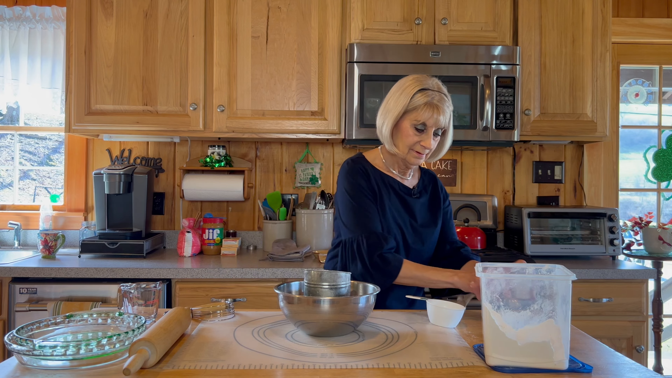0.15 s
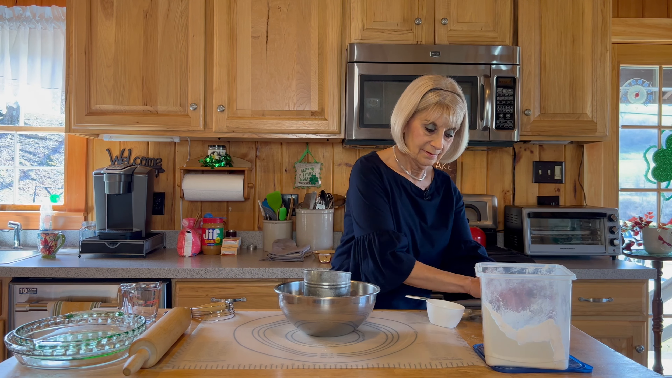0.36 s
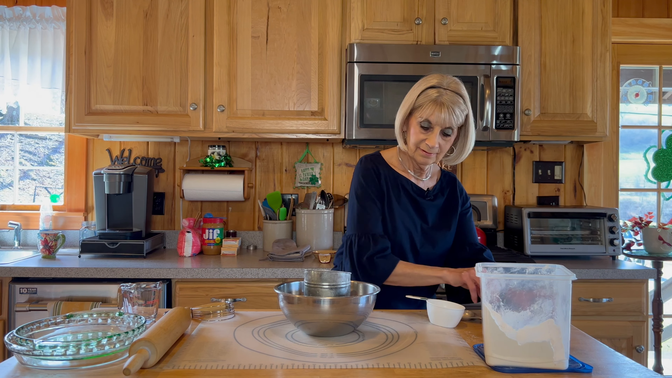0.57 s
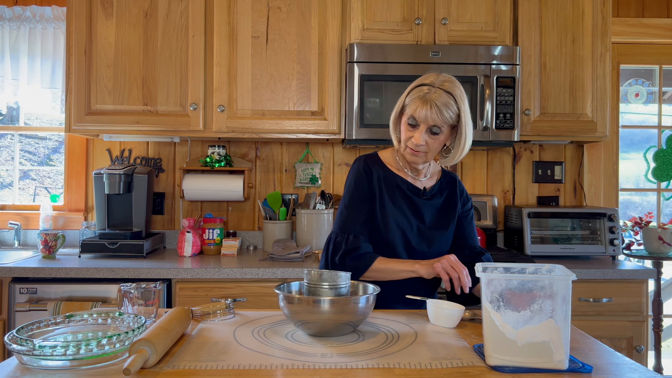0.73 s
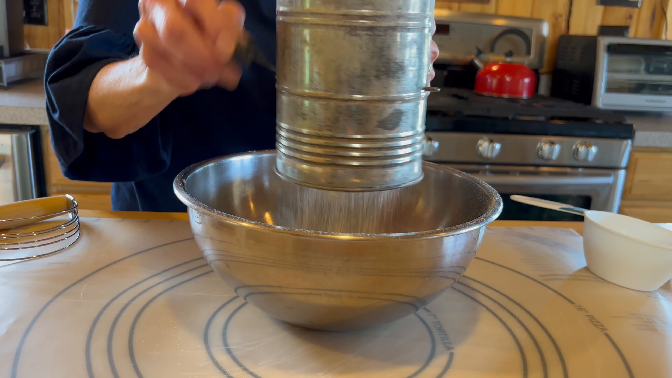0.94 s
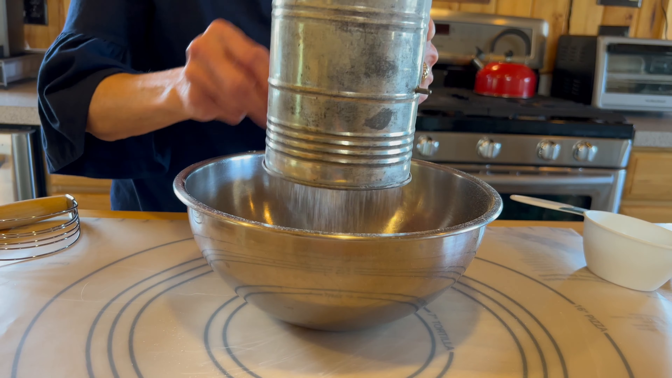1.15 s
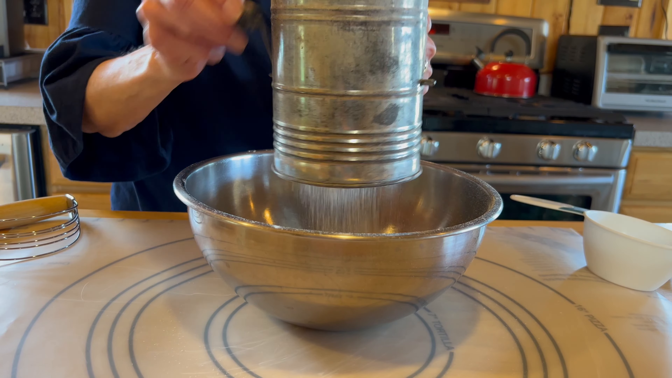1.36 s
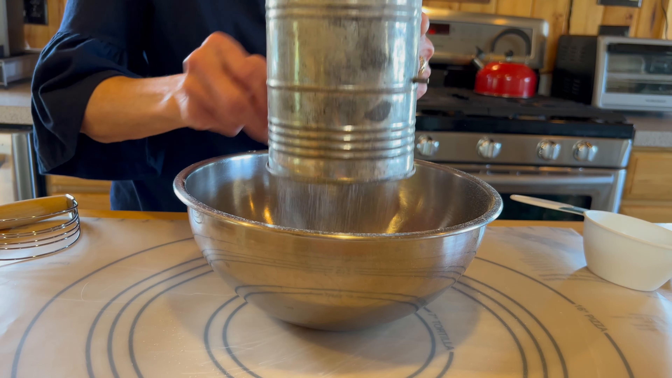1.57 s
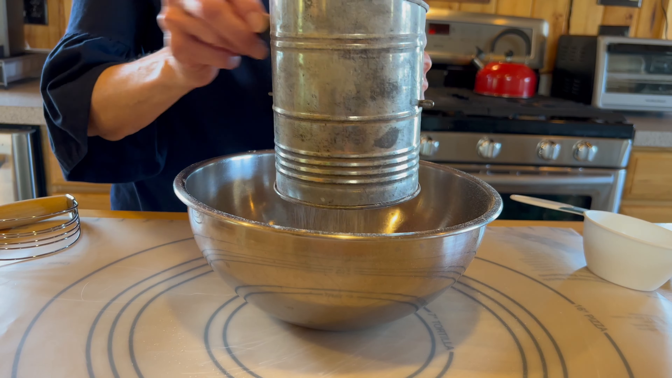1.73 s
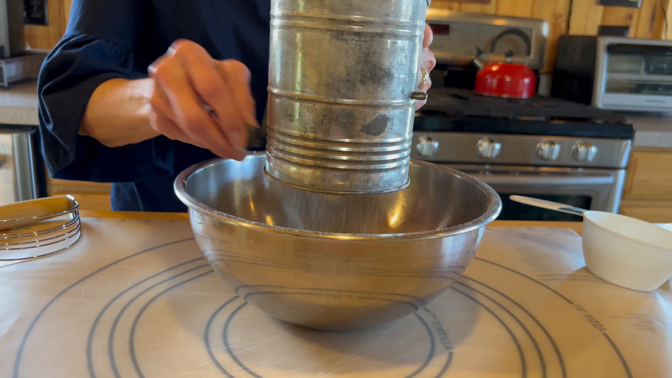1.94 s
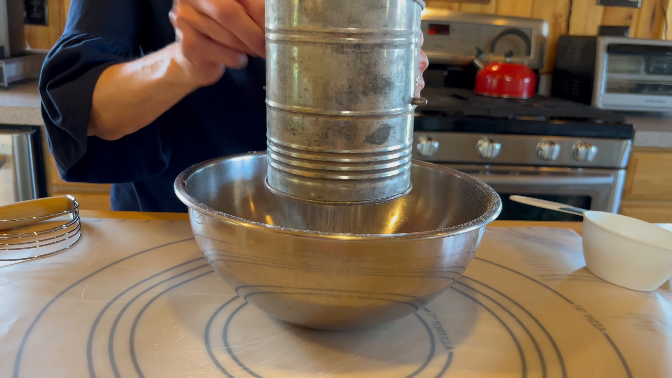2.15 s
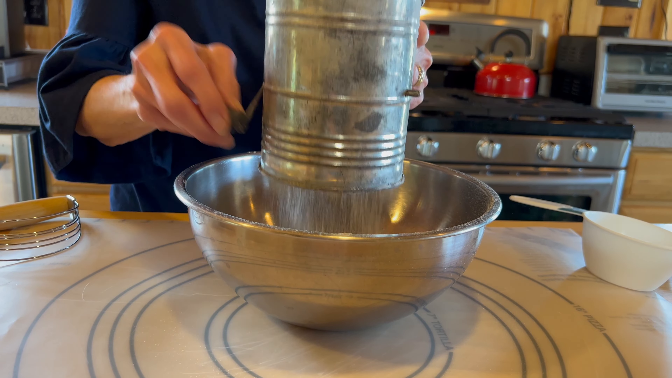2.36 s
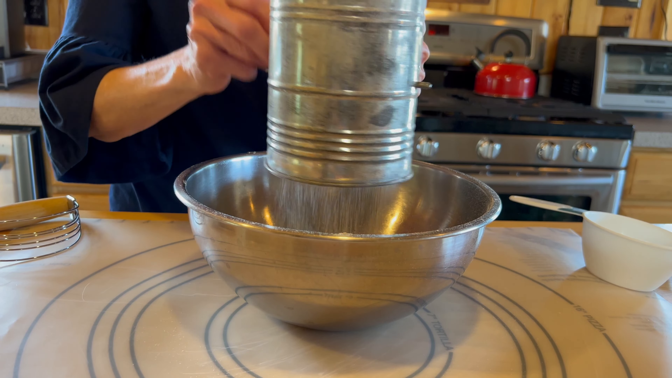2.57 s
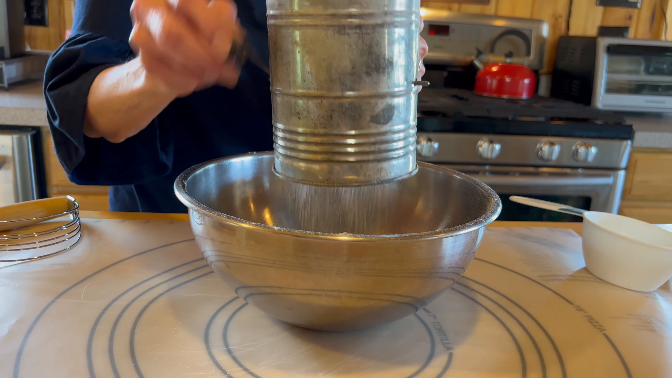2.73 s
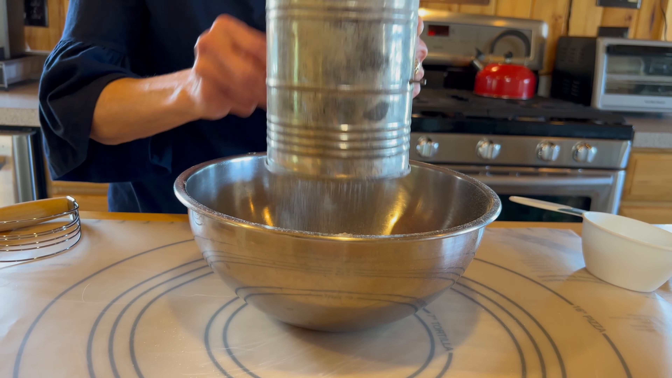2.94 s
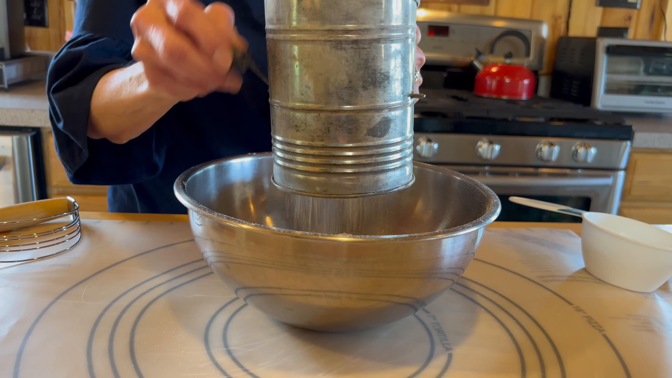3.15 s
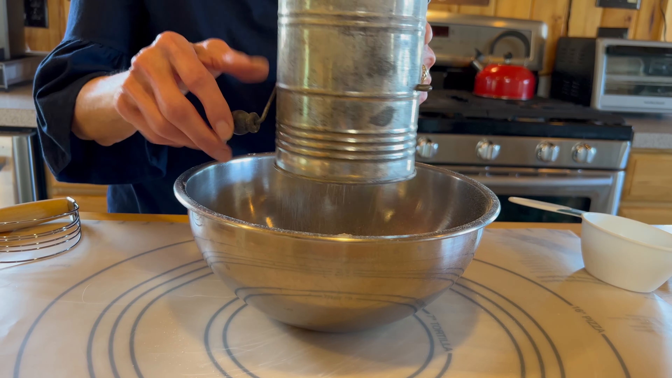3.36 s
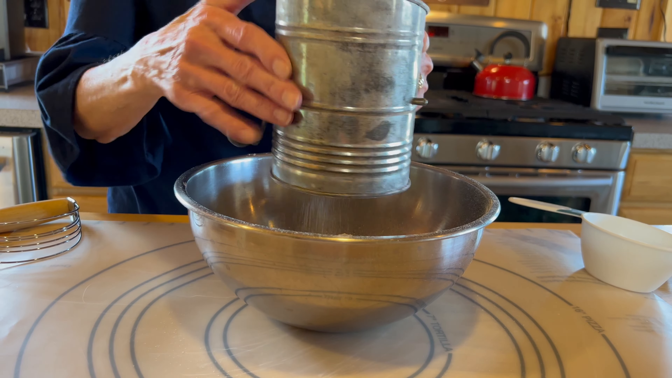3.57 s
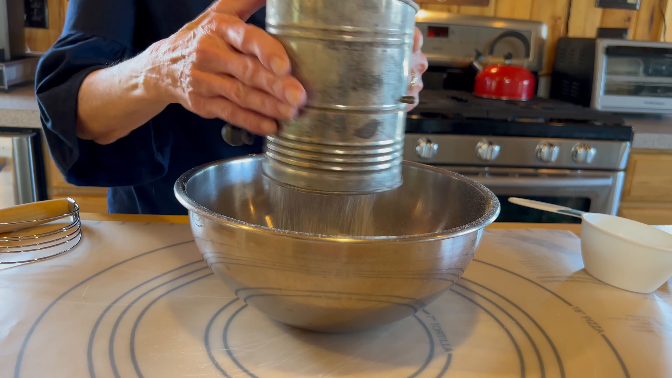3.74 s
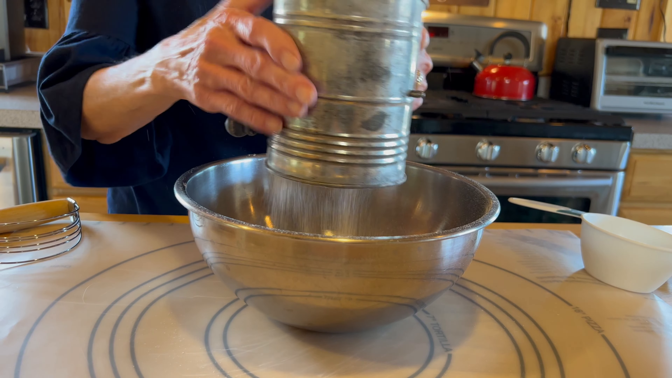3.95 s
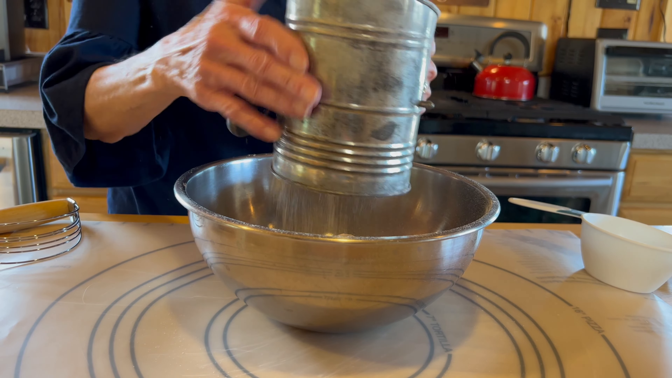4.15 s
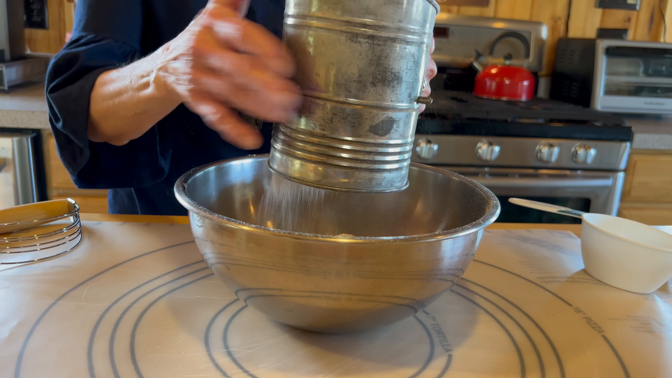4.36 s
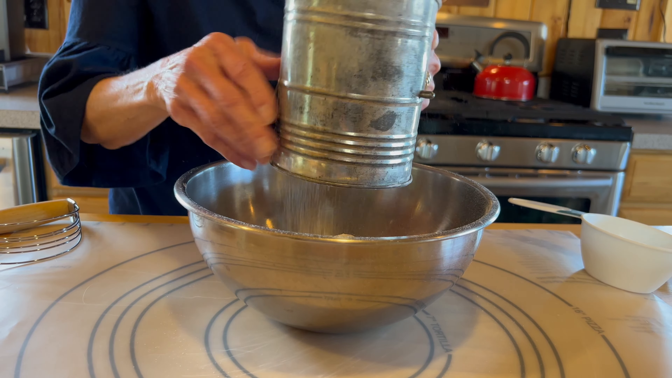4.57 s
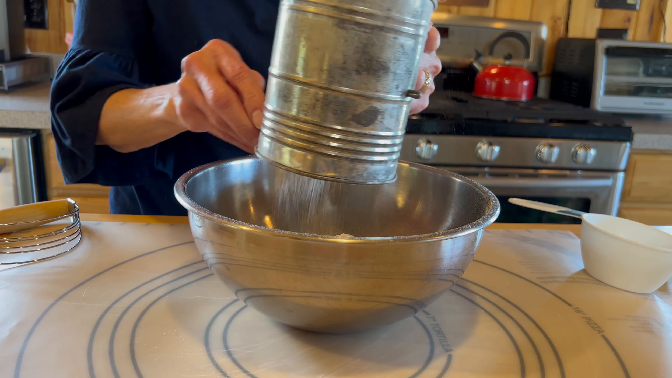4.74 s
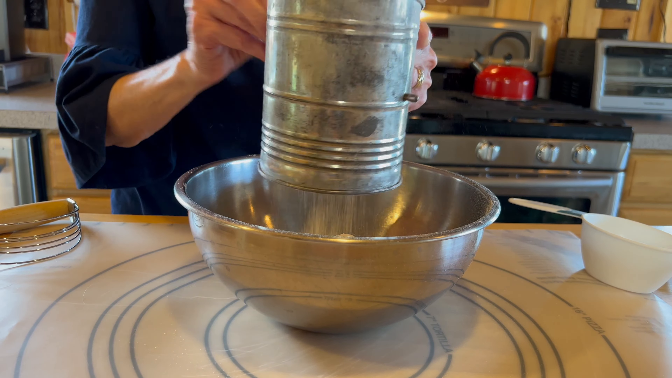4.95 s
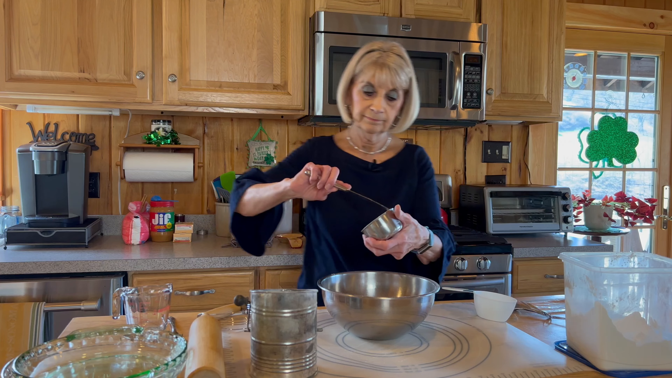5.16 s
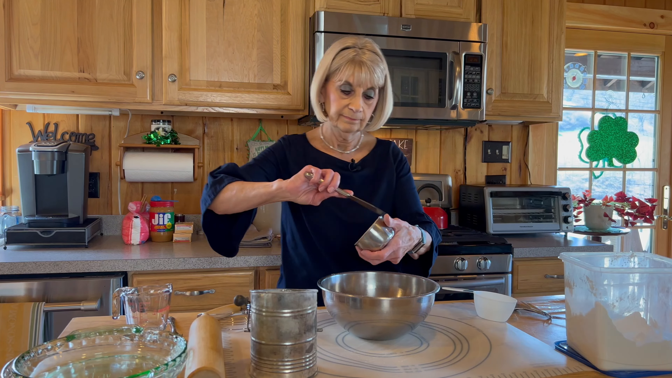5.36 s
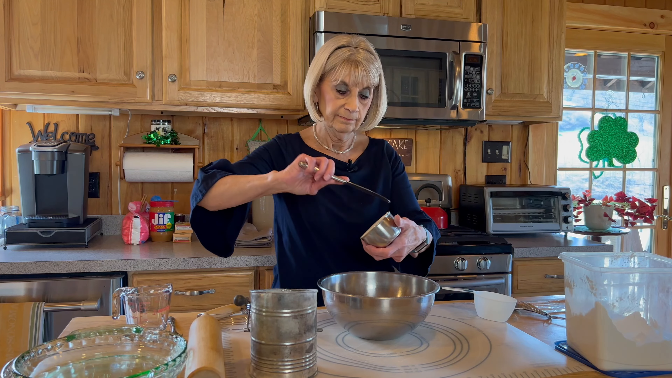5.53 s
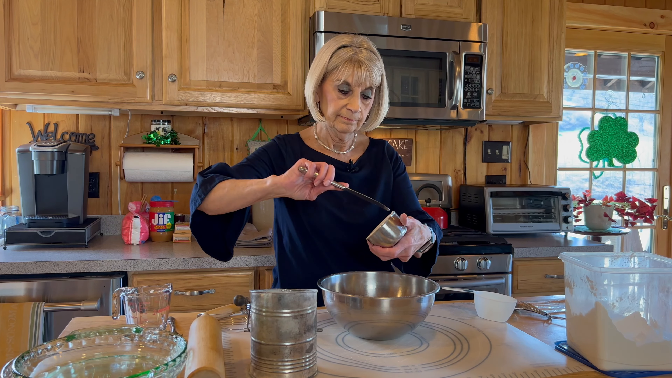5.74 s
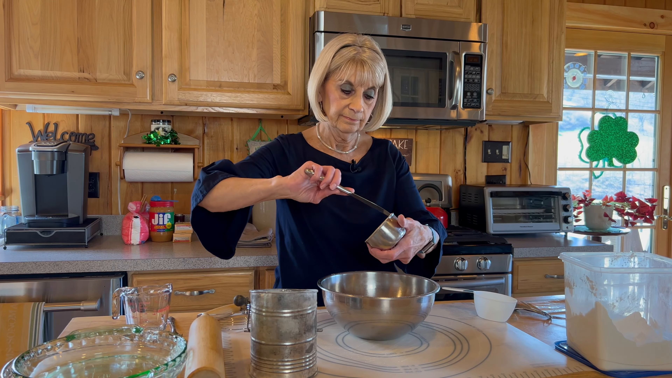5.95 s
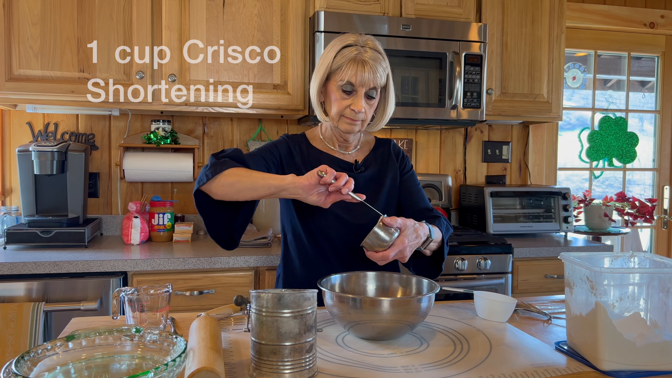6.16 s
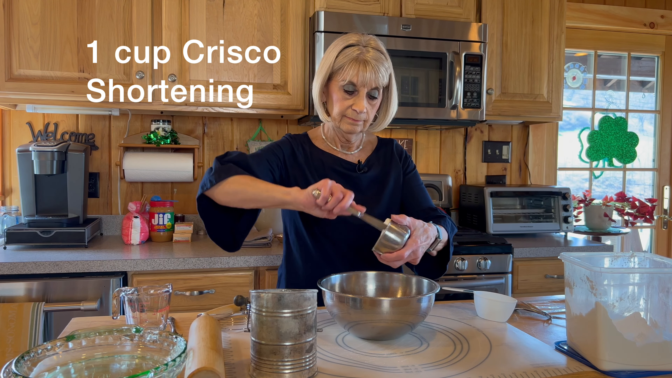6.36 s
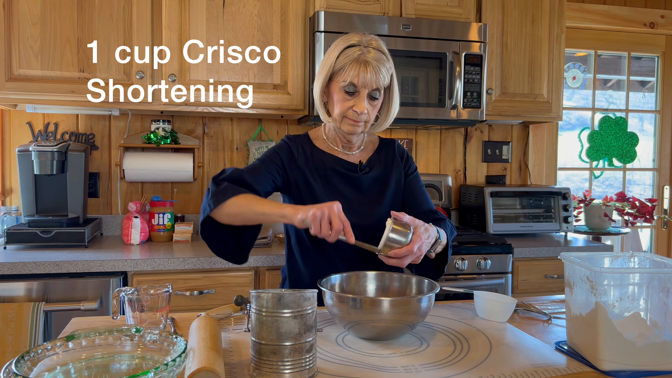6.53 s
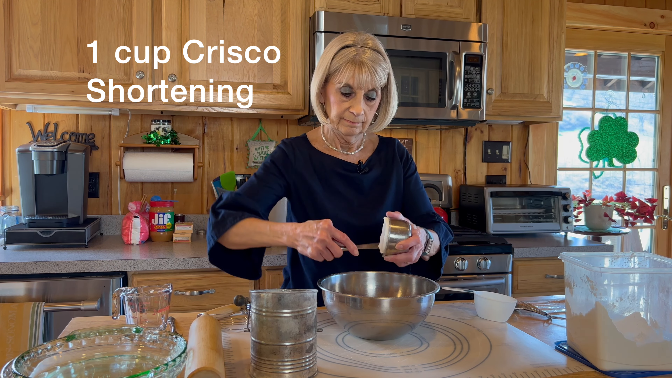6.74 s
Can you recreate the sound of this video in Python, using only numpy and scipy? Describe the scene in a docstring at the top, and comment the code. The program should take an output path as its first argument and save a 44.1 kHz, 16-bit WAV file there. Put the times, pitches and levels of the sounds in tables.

```python
"""A kitchen, close to one microphone, in three joined scenes over room tone and a faint appliance whine.
First metal scoops jangle in a wooden drawer that thuds shut. From 0.93 s a tin flour sifter is cranked,
its two wire beaters rasping over the mesh and snapping free; from 3.56 s a palm pats the can six times,
and a few slow drags and loose clicks follow. After 5 s a spoon taps a cup twice, then scrapes along its
wall, squelching through fat, and the hollow note of the cup rises as it empties."""
import sys
import numpy as np
from scipy import signal
from scipy.io import wavfile
from scipy.ndimage import uniform_filter1d

SR = 44100
rng = np.random.default_rng(int(sys.argv[2]) if len(sys.argv) > 2 else 0)


def persist_wave(psi):
    """Save psi, clipped to +-1, as 16-bit WAV."""
    counts = np.round(np.clip(psi, -1, 1) * 32767).astype(np.int16)
    wavfile.write(sys.argv[1], SR, np.atleast_2d(counts).T)


N = 304310
TIME = np.arange(N) / SR


def gain_of(db):
    return 10 ** (np.asarray(db) / 20)


def unit_rms(x):
    return x / np.sqrt(np.mean(x ** 2) + 1e-20)


def value_at(points, hz):
    f, value = np.transpose(points)
    return np.interp(np.log(hz + 1), np.log(f + 1), value)


def envelope(rows):
    """Gain through rows of t/s, level/dB; silent outside them."""
    return gain_of(np.interp(TIME, *np.transpose(rows), -200, -200))


def swell(middle, length, db):
    """One smooth rise and fall."""
    return gain_of(db) * np.cos(np.pi * np.clip((TIME - middle) / length, -.5, .5)) ** 2


def waver(depth_db, shape, samples):
    """Gains that wander at random, smoothed over so many samples."""
    return gain_of(depth_db * unit_rms(uniform_filter1d(rng.standard_normal(shape), size=samples)))


def grit(per_s, spread_db, smooth):
    """Dense tiny impacts of uneven size over smooth noise."""
    hits = (rng.random(N) < per_s / SR) * gain_of(spread_db * np.minimum(rng.exponential(1, N), 3.5))
    return unit_rms(unit_rms(hits * rng.standard_normal(N)) + smooth * rng.standard_normal(N))


def blows(times, db, t60, tail_db, tail_t60, rise_s):
    """A noise burst for each blow, dying as the sum of two decays."""
    t, train = TIME[:12000], np.zeros(N)
    train[np.round(np.asarray(times) * SR).astype(int)] = gain_of(db)
    decay = gain_of(-60 * t / t60) + gain_of(tail_db - 60 * t / tail_t60)
    attack = 1 - np.exp(-t / rise_s)
    return signal.oaconvolve(train, decay * attack)[:N] * rng.standard_normal(N)


def body(x, spectrum, modes=(), ring_db=-99):
    """An object's response to x: minimum-phase colour plus ringing modes, at unit energy."""
    t, hz = TIME[:8192], abs(np.fft.fftfreq(8192, 1 / SR))
    log_gain = np.log(gain_of(np.maximum(value_at(spectrum, hz), -90)))
    taps = unit_rms(np.fft.ifft(np.exp(np.conj(signal.hilbert(log_gain)))).real)
    if len(modes):
        ring = sum(gain_of(db - 60 * t / t60) * np.sin(2 * np.pi * f * t) for f, db, t60 in modes)
        taps = taps + gain_of(ring_db) * unit_rms(ring)
    return signal.oaconvolve(x, taps / np.linalg.norm(taps))[:N]


def ringing(drive, modes, favour_db, dwell_s):
    """A moving contact favours now one mode, now another."""
    favours = waver(favour_db, (len(modes), len(drive)), round(dwell_s * SR))
    t = TIME[:SR // 4]
    rings = [gain_of(db - 60 * t / t60) * np.sin(2 * np.pi * hz * t) for hz, db, t60 in modes]
    return sum(signal.oaconvolve(w * drive, ring)[:len(drive)] for w, ring in zip(favours, rings))


def resonate(x, hz, width_hz):
    """A steep resonance at hz, steady or gliding."""
    turn = np.exp(2j * np.pi * np.cumsum(np.broadcast_to(hz, N)) / SR)
    pole = np.exp(-np.pi * width_hz / SR)
    lowpass = [1 - pole], [1, -pole]
    band = turn * signal.lfilter(*lowpass, signal.lfilter(*lowpass, x / turn))
    return 2 * band.real / np.sqrt(np.pi * width_hz / SR)


# Kitchen air all round the microphone: f/Hz, level/dB
ROOM_SPECTRUM = [(20, -11), (139, -12.5), (273, -11), (332, -12.5), (583, -13), (1080, -21),
                 (1900, -22.5), (5800, -31.5), (10000, -32), (13000, -34.5), (16500, -39.5)]
# Appliance in the background: f/Hz, level/dB, entry t/s
WHINE_TONES = [(586.8, -83, 0), (1443, -85, 0), (1927, -85, 5.55), (2891, -83, 5.58)]
def room_tone():
    """Steady air and the faint, wavering whine of an appliance."""
    wavers = waver(1.5, (len(WHINE_TONES), N), 9000)
    whine = 0
    for gain, (hz, db, entry) in zip(wavers, WHINE_TONES):
        fade_in = np.clip((TIME - entry) / 0.041, 0, 1)
        whine += gain * fade_in * gain_of(db) * np.sqrt(2) * np.sin(2 * np.pi * hz * TIME)
    return gain_of(-68) * body(rng.standard_normal(N), ROOM_SPECTRUM) + whine


# Decay of the kitchen: f/Hz, t60/s
ROOM_DECAY = [(150, 0.24), (700, 0.34), (2500, 0.38), (7000, 0.24), (15000, 0.2)]
def reverb(x):
    """Dense, smooth reverberation, each band dying at its own speed; three tails crossfade rapidly."""
    out = 0
    for k in range(3):
        hz, t, bands = signal.stft(rng.standard_normal(SR // 2), SR, nperseg=256)
        decay = gain_of(-60 * t / value_at(ROOM_DECAY, hz)[:, None])
        tail = signal.istft(bands * decay, SR, nperseg=256)[1]
        tail[:250] = 0  # gap before the first reflection reaches the microphone
        share = np.sqrt(2 / 3) * np.cos(2 * np.pi * (43 * TIME + k / 6))
        out += signal.oaconvolve(share * x, tail / np.linalg.norm(tail))[:N]
    return out


# Jolts of the drawer: t/s, clank/dB, chatter/dB, length/s, rumble/dB
DRAWER_JOLTS = [(0.063, -51, -63.5, 0.012, -90.5), (0.084, -45, -70, 0.0088, -90),
                (0.1155, -29.5, -46, 0.005, -41.5), (0.239, -28, -31.5, 0.015, -38.5),
                (0.2864, -21.5, -39, 0.077, -37.5), (0.395, -26.5, -31, 0.048, -40),
                (0.44, -24.5, -42, 0.013, -59.5), (0.556, -42, -54, 0.02, -57)]
def shaking(levels_db, sag_db_s, stop_db_s):
    """After each jolt the level sags while the shaking lasts, then dies."""
    level = 0
    for (start, _, _, length, _), db in zip(DRAWER_JOLTS, levels_db):
        age = TIME[:SR] - start
        level += (age > 0) * gain_of(db - sag_db_s * age - stop_db_s * np.maximum(age - length, 0))
    return np.pad(level, (0, N - SR))


# Ring of the metal scoops: f/Hz, level/dB, t60/s
METAL_MODES = [(3542, -6, .08), (4183, -4, .06), (2735, -6, .06), (6712, -2, .08), (7129, -2, .07),
               (8304, 0, .07), (9770, -4, .045), (10570, -5, .05), (11008, -3, .055), (11548, -5, .06),
               (12181, -4, .06), (14539, -3, .045), (15200, -2, .04)]
# Their clank: f/Hz, level/dB
METAL_SPECTRUM = [(880, -54.5), (1500, 2), (4140, 0.5), (5350, -2), (6510, 4.5), (8580, 0.5), (9010, -7.5),
                  (10700, 5.5), (15800, -2)]
def scoops():
    """Scoops clank and chatter together, each contact favouring other modes."""
    times, clank_db, chatter_db, _, _ = np.transpose(DRAWER_JOLTS)
    clanks = blows(times, clank_db, 0.019, -28.5, 0.082, 0.00077)
    chatter = shaking(chatter_db, sag_db_s=58, stop_db_s=489.5) * grit(4700, 0.9, 0.52)
    drive = (clanks + chatter)[:SR]
    ring = gain_of(-30) * ringing(drive, METAL_MODES, favour_db=4, dwell_s=.015)
    return np.pad(body(drive, METAL_SPECTRUM)[:SR] + ring, (0, N - SR))


# Knocks of the closing drawer: t/s, level/dB
WOOD_KNOCKS = [(0.116, -31), (0.2868, -17), (0.558, -3.5)]
# Its wooden panels: f/Hz, level/dB, t60/s
WOOD_MODES = [(266, 0, .09), (365, 1, .07), (452, 9, .09), (545, 0, .05), (625, 2, .07), (713, 2, .08),
              (879, 0, .08), (1034, -5, .06), (1108, -7, .05)]
# Their thud: f/Hz, level/dB
WOOD_SPECTRUM = [(100, -29.5), (401, -10.5), (447, 2), (538, -3.5), (1060, -1.5), (2200, -10.5),
                 (3300, -21), (5000, -54)]
def drawer():
    """The wooden drawer rumbles with each jolt and knocks shut."""
    times, db = np.transpose(WOOD_KNOCKS)
    knocks = blows(times, db, 0.0021, -20, 0.06, 0.00015)
    rumble_db = np.transpose(DRAWER_JOLTS)[4]
    rumble = shaking(rumble_db, sag_db_s=32, stop_db_s=255.5) * grit(1200, 3.2, 0.56)
    wood = body(abs(knocks) + 0.4 * knocks, WOOD_SPECTRUM, WOOD_MODES, ring_db=3.2)
    wood += body(rumble, WOOD_SPECTRUM, WOOD_MODES, ring_db=-10)
    return signal.sosfilt(signal.butter(5, 290, "high", fs=SR, output="sos"), wood)  # cuts deep bass


# Spoon on the cup: t/s, level/dB, relative knock/dB
CUP_TAPS = [(5.2671, -42, -13), (5.4175, -34, -23.5)]
# Bright edge of a tap: f/Hz, level/dB
TAP_SPECTRUM = [(880, -41), (1500, -24.5), (5870, -8.5), (9500, -16), (14600, -11.5), (16500, -24)]
# Dull thump, of the cup and of the patted can: f/Hz, level/dB
THUMP_SPECTRUM = [(24, -65), (40, -15.5), (558, -3), (749, -7), (927, -2.5), (1240, -8), (2000, -5),
                  (2600, -8), (4400, -120)]
def spoon_taps():
    """The spoon ticks against the cup, with a dull knock underneath."""
    times, db, knock_db = np.transpose(CUP_TAPS)
    ticks = blows(times, db, 0.011, -15, 0.093, .0001)
    knocks = blows(times, db + knock_db, 0.032, 7, 0.032, 0.00026)
    return body(ticks, TAP_SPECTRUM) + body(knocks, THUMP_SPECTRUM)


# Hollow note of the cup: t/s, level/dB
HOLLOW_LEVEL = [(6.05, -86.5), (6.18, -60.5), (6.21, -65), (6.28, -54), (6.5, -60.5), (6.7, -47),
                (6.9, -50.5)]
# A faint hiss fading after the second tap (first row), then pushes along the cup's wall:
# middle t/s, length/s, scratch/dB, hiss/dB
CUP_SWELLS = [(5.504, 0.5, -73, -71.5), (6.139, 0.1, -58.5, -57.5), (6.246, 0.071, -60, -75),
              (6.432, 0.13, -61.5, -68), (6.539, 0.15, -54.5, -60), (6.767, 0.11, -50.5, -60),
              (6.894, 0.17, -64, -67.5)]
# Fat between spoon and wall: middle t/s, length/s, f/Hz, level/dB
FAT_SQUELCHES = [(6.135, .06, 5100, -61), (6.255, .08, 3300, -59), (6.52, .09, 3150, -52),
                 (6.55, .1, 6050, -63), (6.56, .08, 1700, -59), (6.76, .06, 2800, -54),
                 (6.785, .05, 1850, -54)]
# Low scratch and high hiss of the scraping: f/Hz, level/dB
SCRATCH_SPECTRUM = [(240, -31), (400, -9), (1030, 1.5), (3160, -2), (4500, -18), (9900, -54)]
HISS_SPECTRUM = [(2350, -31), (4000, -6.5), (4780, -7.5), (7930, -5), (12100, -12), (15800, -21)]
def spoon_scrapes():
    """The spoon sticks and slips through fat, sounding the cup's hollow, which rises as it empties."""
    hollow_hz, empties_s, rise_hz_s = 860, 6.64, 1190
    drag = envelope(HOLLOW_LEVEL)
    slips = waver(3, (2, N), 350)
    drive = unit_rms(slips[0] * grit(2000, 1.6, 1.14)) * drag
    hollow = resonate(drive, hollow_hz + rise_hz_s * np.maximum(TIME - empties_s, 0), width_hz=230)
    friction = unit_rms(np.sqrt(slips[1]) * grit(3000, 3.6, 0.99))
    squelch = sum(resonate(friction * swell(middle, length, db), hz, width_hz=390)
                  for middle, length, hz, db in FAT_SQUELCHES)
    scratch, hiss = gain_of(-12) * drag, gain_of(-26) * drag
    for middle, length, scratch_db, hiss_db in CUP_SWELLS:
        scratch += swell(middle, length, scratch_db)
        hiss += swell(middle, length, hiss_db)
    return hollow + squelch + body(friction * scratch, SCRATCH_SPECTRUM) + body(friction * hiss, HISS_SPECTRUM)


# The sifter's tin can: f/Hz, level/dB, t60/s
TIN_MODES = [(370, -7, .05), (580, -3, .045), (964, -1, .045), (1520, -10, .04), (2140, -6, .05),
             (2730, -8, .03), (3780, -5, .06), (4300, -2, .07), (4810, -3, .025), (5700, -6, .04)]
# Snap of its wires and crank: f/Hz, level/dB
SNAP_SPECTRUM = [(590, -39), (1000, -18.5), (2140, -4.5), (3600, -4), (4920, 1), (6650, -8.5), (7460, -2.5),
                 (8870, -12), (11400, -11), (15800, -24)]
# Pats on the can: t/s, palm/dB, slap lag/s, slap/dB, bounce/dB, mode index, ring/dB, mode index, ring/dB
PALM_PATS = [(3.561, -34, 0.0068, -39.5, -38, 1, -42.5, 5.5, -34),
             (3.736, -34, 0.0022, -30, -66, 7, -30, 4, -31), (3.923, -35, 0.0051, -42, -45, 2, -34, 0, -36),
             (4.114, -31, .004, -26.5, -61, 4, -32, 2.5, -42),
             (4.3, -32.5, 0.0038, -33, -51, 1, -31.5, 8, -31),
             (4.491, -38.5, 0.0068, -34.5, -41.5, 3, -37, -1.5, -41.5)]
def sifter_pats():
    """The palm thumps the can; the loose crank slaps and bounces; each spot rings two favoured modes."""
    lands, palm_db, lags, slap_db, bounce_db = np.transpose(PALM_PATS)[:5]
    times = np.r_[lands, lands + lags, lands + lags + 0.0124]  # palm, slap, bounce
    rattle = blows(times, np.r_[palm_db - 7, slap_db, bounce_db], 0.042, -1, 0.037, 0.00057)
    rattle = body(signal.lfilter([1, -.3], [1], rattle), SNAP_SPECTRUM, TIN_MODES[4:], ring_db=-14)
    palm = blows(times, np.r_[palm_db, slap_db - 18.5, bounce_db - 7.5], 0.04, -12.5, 0.074, 0.0006)
    thump = body(palm, THUMP_SPECTRUM, TIN_MODES[:4], ring_db=-3)
    shove = signal.sosfilt(signal.butter(2, (55, 200), "band", fs=SR, output="sos"), palm)  # whole can
    rings, t = np.zeros(N), TIME[:6000]
    for land, _, lag, _, _, *spot in PALM_PATS:
        start = round((land + lag) * SR)
        for mode, ring_db in (spot[:2], spot[2:]):
            hz, _, t60 = TIN_MODES[round(mode)]
            decay = gain_of(ring_db - 60 * t / (0.74 * t60))
            rings[start:start + len(t)] += decay * np.sin(2 * np.pi * hz * t)
    return rings + rattle + thump + gain_of(-4.5) * shove


# Two beater wires in turn, the stiff one first; leads and lag count from the snap:
# snap t/s, snap/dB, landing lead/s, landing/dB, rasp/dB, tick lead/s, crank knock lag/s
WIRE_PASSES = [(0.9685, -22, 0.034, -65, -46, 0.015, .083), (1.2124, -43.5, 0.14, -59, -51, 0.028, 0.039),
               (1.4261, -21.5, 0.12, -72, -47, 0.016, 0.068), (1.6294, -35, 0.11, -57, -48, 0.0093, 0.041),
               (1.8552, -22.5, 0.13, -35, -48, 0.013, 0.11), (2.0788, -38, 0.12, -53, -48, 0.025, .049),
               (2.3167, -22.5, 0.14, -66, -49.5, 0.015, 0.063),
               (2.5342, -38, 0.126, -57, -48.5, 0.025, .055),
               (2.768, -22.5, 0.12, -49, -46.5, 0.015, 0.047), (2.9645, -39, 0.11, -61, -47, 0.0049, 0.054),
               (3.187, -25, 0.13, -38.5, -46.5, 0.017, .07)]
# Slow drags as the crank stops or is taken up again: t/s, length/s, level/dB
SLOW_DRAGS = [(3.314, 0.04, -55), (4.629, 0.037, -49.5), (4.72, 0.052, -52.5), (4.915, 0.1, -47)]
# Murmur of axle and loose flour: t/s, level/dB
AXLE_LEVEL = [(.93, -60.5), (3.25, -58.5), (3.45, -88), (4.55, -76), (4.65, -64), (5.03, -58)]
# The mesh, heard close: f/Hz, level/dB
MESH_SPECTRUM = [(88, -35), (150, -13.5), (560, 0), (713, -13), (974, 3.5), (1150, -7.5), (1470, -5),
                 (11600, -15.5), (15800, -27)]
def sifter_rasp():
    """Wire ticking across the mesh threads rings the can; between passes a dull murmur is left."""
    lift_s, sag_db = (0.019, 0.031), -3  # the stiff and the soft wire lift this long before their tick
    strokes = list(SLOW_DRAGS)
    for k, (snap, _, land_lead, _, rasp_db, tick_lead, _) in enumerate(WIRE_PASSES):
        strokes.append((snap - land_lead, land_lead - tick_lead - lift_s[k % 2], rasp_db))
    level = sum(envelope([(start, db), (start + max(length, .002), db + sag_db)])
                for start, length, db in strokes)
    murmur = signal.lfilter([.45], [1, -.55], envelope(AXLE_LEVEL) * grit(1000, 2.9, 0.54))
    drive = uniform_filter1d(level, size=350) * grit(3000, 2.5, 1.45) + murmur
    ring = gain_of(-43) * ringing(drive, TIN_MODES, favour_db=3.6, dwell_s=0.025)
    return body(drive, MESH_SPECTRUM) + ring


# Loose clicks around the slow drags: t/s, level/dB, relative knock/dB
LOOSE_CLICKS = [(3.3203, -51, 5), (3.351, -51, 2), (4.812, -61, 4), (4.8415, -54.5, 7), (4.881, -40, 1.5),
                (4.9094, -35.5, -23)]
def sifter_clicks():
    """Each wire lands, ticks and snaps free, then the crank drops into its play; all knock the can."""
    tick_db, crank_db = (-36, -45), (-66, -46.5)  # pairs: stiff wire, soft wire
    tick_knock_db, snap_knock_db = (-8, -10.5), (-13, -5.5)
    clicks = list(LOOSE_CLICKS)
    for k, (snap, snap_db, land_lead, land_db, _, tick_lead, crank_lag) in enumerate(WIRE_PASSES):
        wire = k % 2
        clicks += [(snap - land_lead, land_db, -11.5),
                   (snap - tick_lead, tick_db[wire], tick_knock_db[wire]),
                   (snap, snap_db, snap_knock_db[wire]),
                   (snap + crank_lag, crank_db[wire], 5)]
    times, db, knock_db = np.transpose(clicks)
    snaps = signal.lfilter([1, -.3], [1], blows(times, db, 0.028, -11, 0.054, 0.00071))
    return body(snaps, SNAP_SPECTRUM) + can_knocks(times, db + knock_db)


# Knock of the can under a click: f/Hz, level/dB
KNOCK_SPECTRUM = [(200, -40.5), (558, 0), (1000, -5.5), (1600, 0), (3000, -11), (7000, -58)]
def can_knocks(times, db):
    """The can answers each click dully, ringing its middle modes."""
    return body(blows(times, db, 0.034, -10, 0.022, 0.00046), KNOCK_SPECTRUM, TIN_MODES[2:5], ring_db=-3)


def scene():
    """Drawer, sifter, cup in mono: each has its own reverberation, cut off where the next begins."""
    joins_s, wet_levels_db = (0, .93, 5.025, 7), (-4, -7, -7)
    out = room_tone()
    parts = (scoops() + drawer(),
             sifter_rasp() + sifter_clicks() + sifter_pats(),
             spoon_taps() + spoon_scrapes())
    for direct, wet_db, start, end in zip(parts, wet_levels_db, joins_s, joins_s[1:]):
        out += (direct + gain_of(wet_db) * reverb(direct)) * (TIME >= start) * (TIME < end)
    return out[None]


def record(dry):
    """At the microphone the top treble steps down 20 dB, just under the band limit."""
    shelf_hz, limit_hz = 15900, 16950
    shelf = signal.firwin2(511, [0, shelf_hz - 100, shelf_hz + 100, SR / 2], [1, 1, .1, .1], fs=SR)
    lowpass = signal.firwin(511, limit_hz, window=("kaiser", 9), fs=SR)
    return signal.oaconvolve(dry, np.convolve(shelf, lowpass)[None], "same")


dry = scene()
out = record(dry)
persist_wave(out)
```